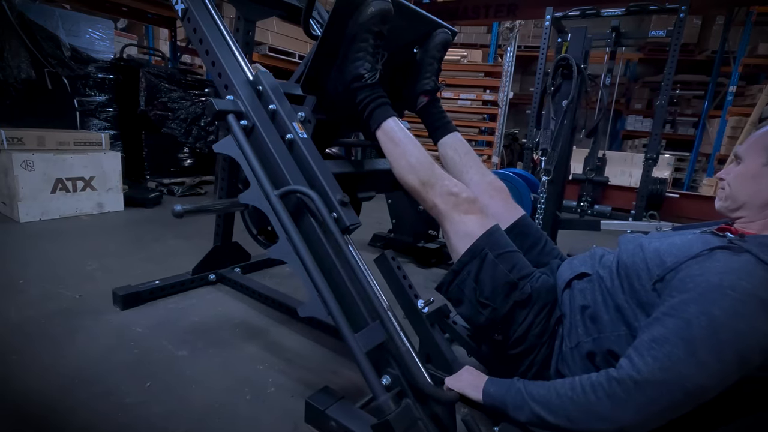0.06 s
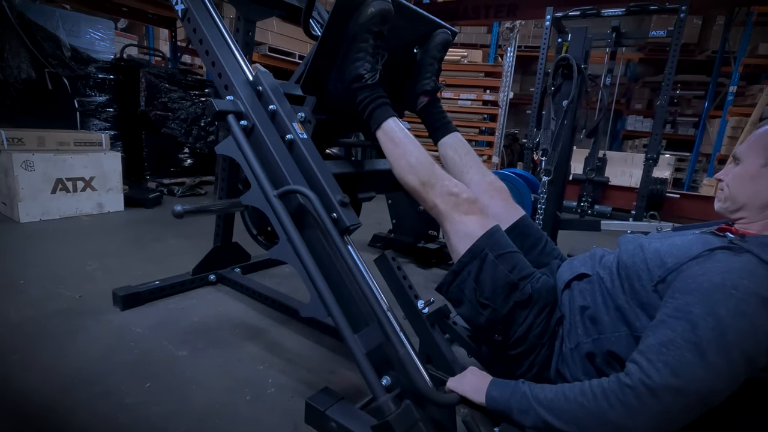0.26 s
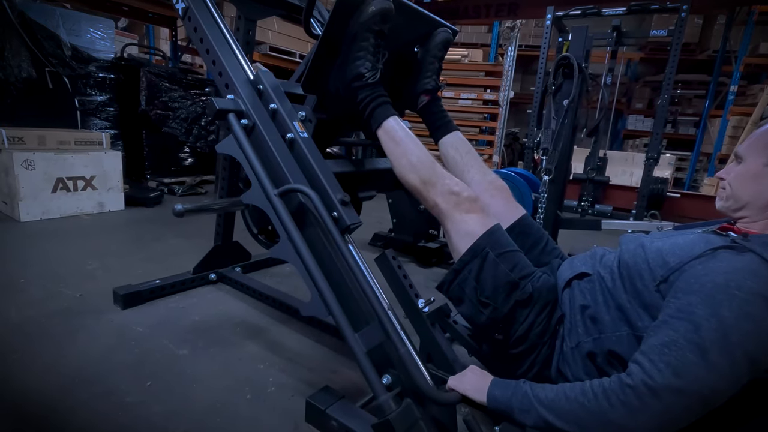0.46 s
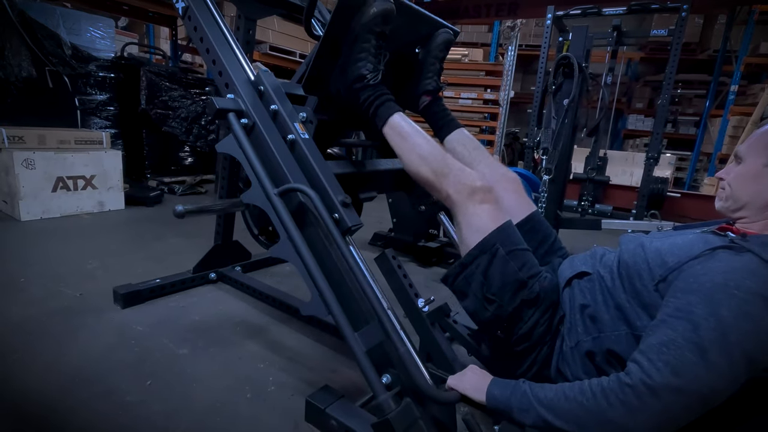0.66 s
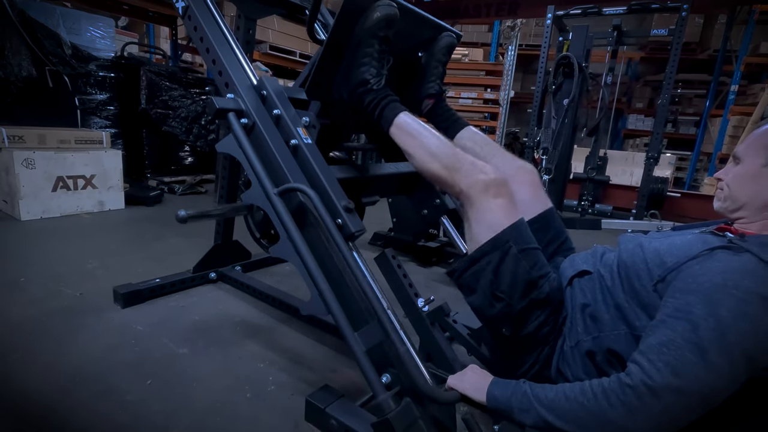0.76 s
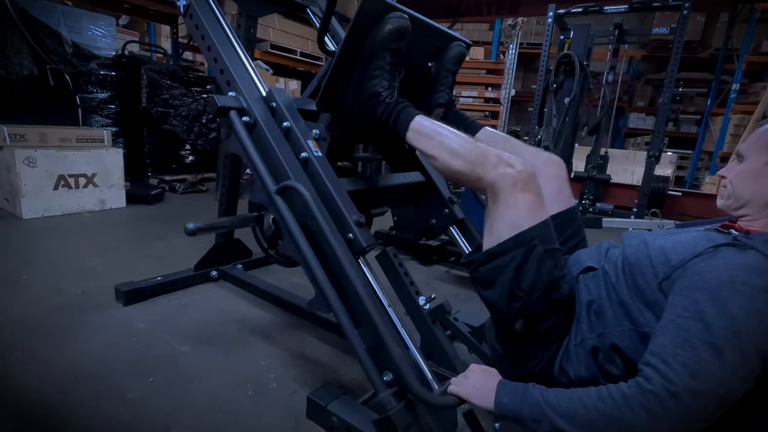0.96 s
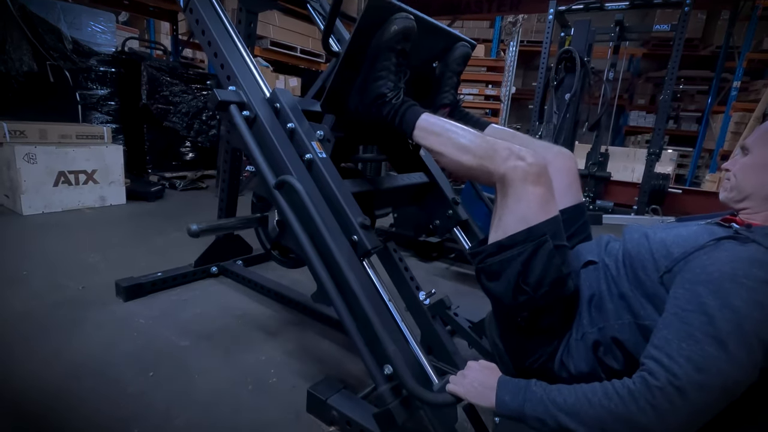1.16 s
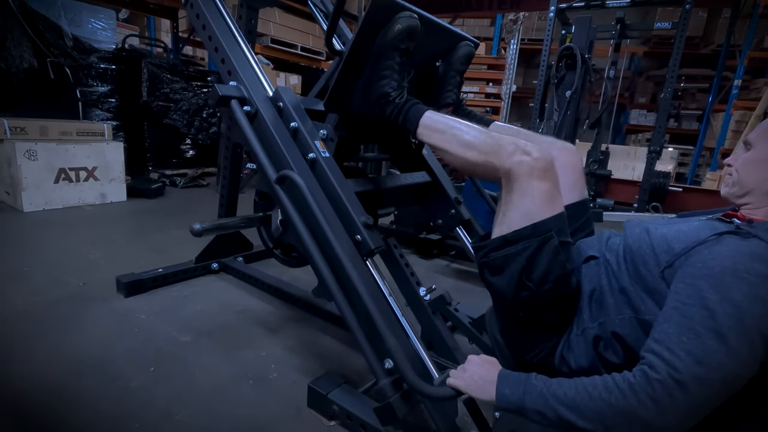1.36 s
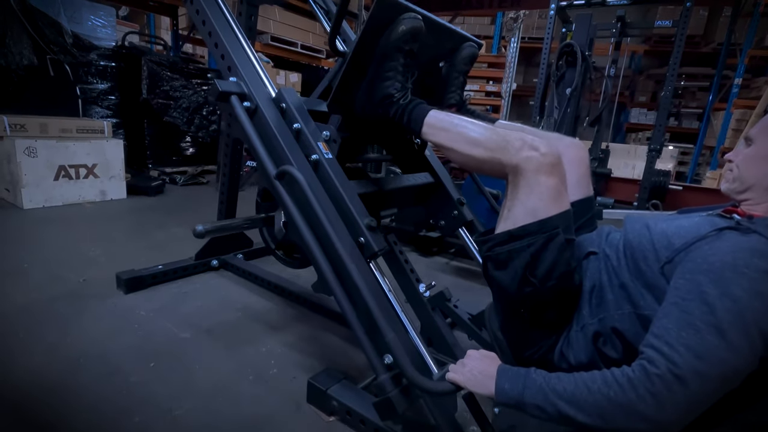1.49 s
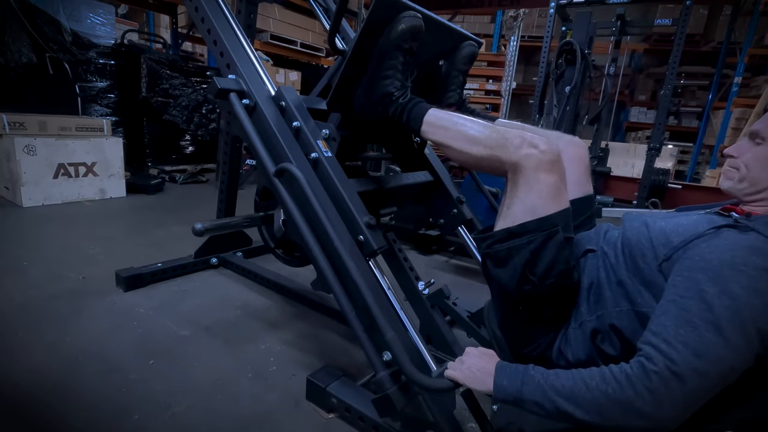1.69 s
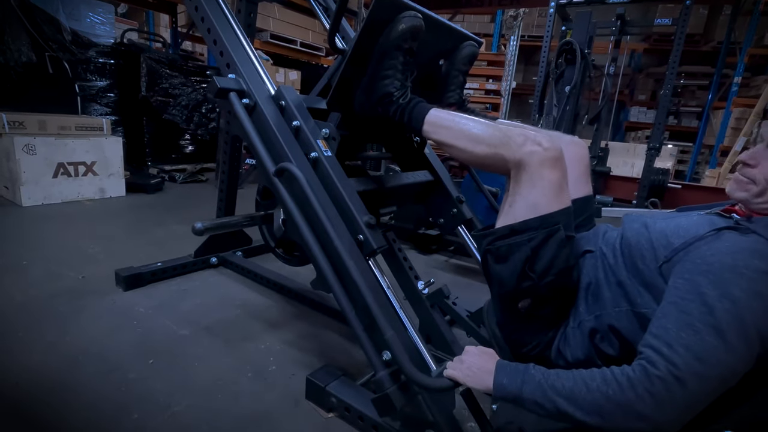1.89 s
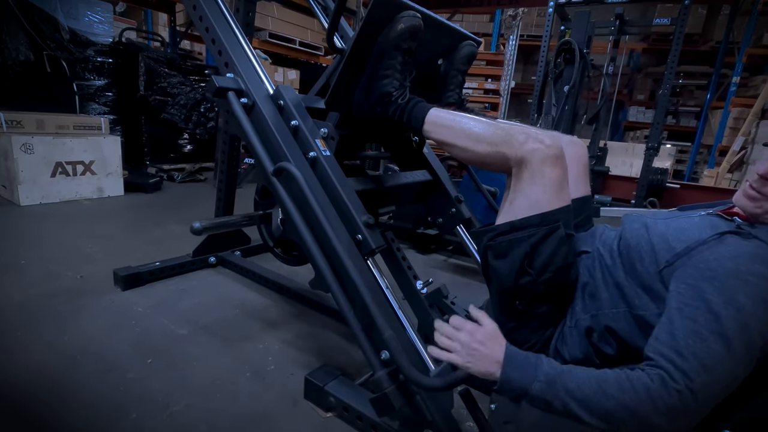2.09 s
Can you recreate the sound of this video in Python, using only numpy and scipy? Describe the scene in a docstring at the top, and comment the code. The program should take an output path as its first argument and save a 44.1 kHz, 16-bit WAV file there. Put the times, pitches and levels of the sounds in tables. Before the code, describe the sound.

A steel leg press in a large hall with faint low ventilation hum. At 0.25 s a locking handle clanks dully; from 0.75 to 1.1 s the frame creaks and the sled rolls with a faint hiss. A second, brighter handle clank comes at 1.13 s, a small tick at 1.4. The sled slams at 1.61 s, bounces at 1.79, rings briefly; light ticks near 2.1.

```python
"""Leg press in a large hall

Over a low ventilation hum, two locking handles clank, each a bank of ringing modes plus lumpy clatter noise.
Between them the frame creaks in dense random slips, and the sled rolls with a narrow-band tone and a hiss.
The sled lands hard on its stops and bounces: ringing steel, dead knocks and bright cracks; small parts tick.
Decaying noise echoes the blows; a nearly mono microphone suppresses noise and limits the loudest peaks."""
import sys
import numpy as np
from scipy import signal
from scipy.fft import rfft, irfft, next_fast_len
from scipy.io import wavfile
from scipy.ndimage import uniform_filter1d

SR = 44100
rng = np.random.default_rng(int(sys.argv[2]) if len(sys.argv) > 2 else 0)


def makeup_ratio(level_db):
    """Linear amplitude ratio for a level in decibels (20 dB per factor of ten)."""
    decades = np.asarray(level_db, float) / 20
    return 10 ** decades


def dump(signal):
    """Clip the signal to [-1, 1] and save it as 16-bit WAV at the path in sys.argv[1]."""
    limited = np.clip(np.atleast_2d(signal).T, -1, 1)
    pcm = np.round(limited * 32767).astype(np.int16)
    wavfile.write(sys.argv[1], SR, pcm)


N = 94374


def unit(x):
    """Scale to rms 1."""
    return x / np.sqrt(np.mean(x ** 2) + 1e-20)


def along(points, hz):
    """Read a curve of (Hz, value) points on a log frequency axis."""
    f, v = np.transpose(points)
    return np.interp(np.log(hz + 1), np.log(f + 1), v)


def curves(rows):
    """Draw one dB curve per column after the time; practically silent outside the rows."""
    s, *cols = np.transpose(rows)
    return [np.interp(np.arange(N) / SR, s, c, left=-140, right=-140) for c in cols]


def filtered(x, response):
    """Filter x by a gain that is a function of frequency."""
    size = next_fast_len(x.shape[-1] + 8192)
    spectrum = rfft(x, size) * response(np.fft.rfftfreq(size, 1 / SR))
    return irfft(spectrum, size)[..., :x.shape[-1]]


def colored(x, colour):
    """Shape x by a (Hz, dB) colour and bring it to rms 1."""
    return unit(filtered(x, lambda hz: makeup_ratio(along(colour, hz))))


def noise(colour, size):
    """Coloured noise of rms 1."""
    return colored(rng.standard_normal(size), colour)


def smooth(x, seconds):
    """A running mean, twice, along the last axis."""
    size = max(round(seconds * SR), 1)
    return uniform_filter1d(uniform_filter1d(x, size=size), size=size)


def add(track, s, x):
    """Mix x into the track at time s."""
    place = track[round(s * SR):][:len(x)]
    place += x[:len(place)]


# Reverb time of the hall. Each row: frequency in Hz, t60 in seconds.
HALL_DECAY = [(150, 0.5), (400, 0.53), (1000, 0.72), (2800, 0.71), (7000, 0.91), (10000, 0.23),
              (14000, 0.31)]
HALL_BUILD_S = 0.008


def hall(x):
    """The echoes build up quickly, then each frequency dies at its own speed."""
    hz, t, z = signal.stft(rng.standard_normal(SR), SR, nperseg=256)
    decay = makeup_ratio(-60 * t / along(HALL_DECAY, hz)[:, None])
    tail = signal.istft(z * decay, SR, nperseg=256)[1][:SR]
    tail = tail * (1 - np.exp(-np.arange(SR) / SR / HALL_BUILD_S))
    return signal.fftconvolve(x, tail / np.linalg.norm(tail))


WAVER_SHARE = .016  # how far the pitch of a mode wanders, as a share of it
RISE_CYCLES = 6.2  # a mode swells over this many cycles on top of the rise of the blow
RATTLE_DB, RATTLE_S = 3, 0.0031  # the clatter comes in lumps: depth, smoothing length


def strike(blows, modes, colour, ring_db, clatter_db, wet_db):
    """Each blow rings the modes of a steel part anew and shakes a burst of clatter out of its joints."""
    out, t = np.zeros(N), np.arange(SR) / SR
    hz, level, ring_s = np.transpose(modes)[:, :, None]
    for s, db, rise, t60, top_hz in blows:
        contact = lambda f: 1 / (1 + (f / top_hz) ** 4)  # a soft contact dulls the blow

        walk = np.cumsum(rng.standard_normal((len(modes), SR)), axis=1)
        drift = smooth(walk, RATTLE_S) * np.sqrt(2 * np.pi * WAVER_SHARE * hz / SR)
        scatter_db = rng.normal(0, 1.5, hz.shape)  # no two blows excite the modes alike
        swell = 1 - np.exp(-t / (rise + RISE_CYCLES / hz))
        size = makeup_ratio(level + scatter_db - 60 * t / ring_s) * contact(hz) * swell
        ring = makeup_ratio(db + ring_db) * np.sum(size * np.sin(2 * np.pi * hz * t + drift), axis=0)

        lumps = unit(makeup_ratio(RATTLE_DB * unit(smooth(rng.standard_normal(SR), RATTLE_S))))
        envelope = makeup_ratio(db + clatter_db - 60 * t / t60) * (1 - np.exp(-t / max(rise, 1e-4)))
        clatter = envelope * lumps * filtered(noise(colour, SR), contact)

        add(out, s, ring + clatter)
        add(out, s, makeup_ratio(wet_db) * hall(clatter + makeup_ratio(-5.5) * ring))
    return out


# Spectrum of the ventilation. Each row: frequency in Hz, relative level in dB.
HUM_COLOUR = [(12, -58), (20, -31), (54, 2.5), (90, -2.5), (122, -1.5), (207, -6), (324, -15), (519, -21.5),
              (565, -16), (1820, -31), (1980, -37.5), (11700, -46), (15500, -49)]
HUM_DB = -41.5


def hum():
    """Ventilation: steady noise with its weight in the bass."""
    return makeup_ratio(HUM_DB) * noise(HUM_COLOUR, N)


# Blows on the first handle. Each row: start in seconds, level in dB before the gains of ring and clatter,
# rise in seconds, clatter t60 in seconds, treble limit of the contact in Hz.
FIRST_BLOWS = [(.238, -41.5, 0.022, 0.3, 9000), (.2585, -15.5, 0.0026, 0.12, 2680),
               (.266, -12.5, 0.012, 0.12, 9000)]
# What it rings with. Each row: frequency in Hz, relative level in dB before scatter, t60 in seconds.
FIRST_RINGING = [(177.2, -12, 0.6), (237.4, -15.5, 0.69), (301, -13.5, 0.36), (450, -10.5, 0.65),
                 (575, -47, 0.15), (636.3, 6.5, 0.14), (723, -14.5, 0.64), (752, -15, 0.076),
                 (862, -10, 0.38), (1020, -18, 0.69), (1107, -5.5, 0.27), (1215, -22.5, .4),
                 (1720, -22.5, 0.79), (2263, -14.5, 0.27)]
# Colour of its clatter. Each row: frequency in Hz, relative level in dB.
FIRST_CLATTER = [(100, -49), (250, -27), (450, -2), (620, -7.5), (900, -9), (1500, -16), (1850, -21),
                 (2400, -29), (3200, -27), (4800, -41), (5800, -67.5), (8000, -38.5), (10000, -58.5),
                 (15500, -84)]


def first_handle():
    """The first locking handle: steel modes ring under clatter from its joints."""
    return strike(FIRST_BLOWS, FIRST_RINGING, FIRST_CLATTER, ring_db=-1.5, clatter_db=6, wet_db=-8)


# The frame taking the load. Each row: time in seconds, level in dB.
CREAK_LEVEL = [(.7, -64), (.745, -46), (.755, -42), (.788, -41.5), (.8, -37), (.83, -35.5), (.86, -37),
               (.9, -42), (.97, -47.5), (1.12, -52)]
# What the frame lets through. Each row: frequency in Hz, relative level in dB.
FRAME_COLOUR = [(120, -45), (200, -42), (328, -6.5), (640, -10.5), (671, -4.5), (983, -21), (1250, -14.5),
                (2010, -33.5), (3630, -36), (9000, -48.5), (11700, -87.5), (19800, -120)]
CREAK_SLIPS_PER_S = 12000  # on average


def creak():
    """Dense uneven slips sound through the frame as the load shifts."""
    slips = (rng.random(N) < CREAK_SLIPS_PER_S / SR) * rng.standard_normal(N)
    return makeup_ratio(curves(CREAK_LEVEL)[0]) * colored(slips, FRAME_COLOUR)


# The sled rolling. Each row: time in seconds, level of the bearing tone in dB, level of the hiss in dB.
ROLL_LEVELS = [(.86, -78, -103.5), (.92, -52, -64), (1.0, -54.5, -60.5), (1.08, -42, -59),
               (1.11, -46, -55.5), (1.16, -68, -95)]
# A hiss that rises under the last ticks. Each row: time in seconds, level in dB.
LATE_HISS_LEVEL = [(1.98, -75), (2.06, -60), (2.14, -56)]
# Spectrum of both hisses. Each row: frequency in Hz, relative level in dB.
HISS_COLOUR = [(1500, -30.5), (2500, 0.5), (6000, 1.5), (12000, -1), (14000, 4), (15500, -23)]
BEARING_HZ, BEARING_WIDTH_HZ = 817, 33  # centre, distance to half amplitude


def rolling():
    """Narrow-band noise wavers like a bearing tone beside a hiss; the hiss returns at the end."""
    tone_db, hiss_db = curves(ROLL_LEVELS)
    bearing = lambda hz: 1 / (1 + ((hz - BEARING_HZ) / BEARING_WIDTH_HZ) ** 2)
    tone = unit(filtered(rng.standard_normal(N), bearing))
    hiss_size = makeup_ratio(hiss_db) + makeup_ratio(curves(LATE_HISS_LEVEL)[0])
    return makeup_ratio(tone_db) * tone + hiss_size * noise(HISS_COLOUR, N)


# Blows on the second handle. Each row: start in seconds, level in dB before the gains of ring and clatter,
# rise in seconds, clatter t60 in seconds, treble limit of the contact in Hz.
SECOND_BLOWS = [(1.127, -16.5, 0.0028, 0.086, 13900), (1.138, -19.5, 0.0075, 0.2, 5930),
                (1.315, -44, 0.0068, 0.062, 1510)]
# What it rings with. Each row: frequency in Hz, relative level in dB before scatter, t60 in seconds.
SECOND_RINGING = [(161.5, -7.5, 0.5), (345, -6, 0.24), (407, -8.5, 0.66), (567, -20.5, 0.15),
                  (712, -3, 0.33), (820, -12, 0.44), (1042, -2.5, 0.38), (1200, -12.5, 0.41),
                  (1286, -5.5, 0.29), (1620, -18, 0.74), (2262, -4.5, 0.19), (2400, -36, .25),
                  (3320, -22, 0.27), (4100, -27, 0.29)]
# Colour of its clatter. Each row: frequency in Hz, relative level in dB.
SECOND_CLATTER = [(100, -55), (250, -21), (340, -11.5), (500, -16.5), (690, -9.5), (1000, -13.5),
                  (2100, -20.5), (3500, -23.5), (6200, -36.5), (7000, -64), (9000, -52), (15500, -63)]


def second_handle():
    """The second locking handle: its own steel modes and clatter."""
    return strike(SECOND_BLOWS, SECOND_RINGING, SECOND_CLATTER, ring_db=1, clatter_db=5.0, wet_db=-8.0)


# Small loose parts. Each row: start in seconds, level in dB before the swell, pitch in Hz,
# cycles to die by 60 dB.
LOOSE_TICKS = [(1.4113, -10, 1600, 8), (1.4122, -19, 1050, 12), (1.4113, -17, 3600, 8),
               (2.0952, -16, 4500, 6), (2.1212, -17, 7800, 7), (2.1327, -12, 3800, 6),
               (2.1328, -17, 12000, 11)]


def ticks():
    """A tick is a few cycles of a sine that swell over about one cycle and die."""
    out, t = np.zeros(N), np.arange(SR // 20) / SR
    for s, db, hz, cycles in LOOSE_TICKS:
        envelope = makeup_ratio(db - 60 * t * hz / cycles) * (1 - np.exp(-t * hz))
        tick = envelope * np.sin(2 * np.pi * hz * t)
        add(out, s, tick)
        add(out, s, makeup_ratio(-10.5) * hall(tick))
    return out


# Blows on the sled. Each row: start in seconds, level in dB before the gains of ring and clatter,
# rise in seconds, clatter t60 in seconds, treble limit of the contact in Hz.
SLED_BLOWS = [(1.585, -41, 0.055, 0.09, 5930), (1.6115, -6, 0.00075, 0.032, 15000),
              (1.645, -6, 0.01, 0.043, 3400), (1.688, -13.5, 0.018, 0.21, 3430),
              (1.791, -9, 0.0016, 0.052, 14600), (1.808, -18.5, 0.004, 0.21, 3530),
              (1.872, -14.5, 0.0048, 0.13, 3240)]
# What it rings with. Each row: frequency in Hz, relative level in dB before scatter, t60 in seconds.
SLED_RINGING = [(129.4, -14.5, 0.29), (165.9, -19, 0.57), (235.8, -10, 0.62), (320, -13.5, 1),
                (446.6, -10, 0.56), (625, -15.5, 0.63), (669, -18, 0.51), (797, -16, 0.47), (1027, -25, 1),
                (1221, -24.5, 1), (1402, -18.5, 0.59), (1660, -10, 0.19), (1709, -21, 0.58),
                (2173, -19.5, 0.56)]
# Colour of its clatter. Each row: frequency in Hz, relative level in dB.
SLED_CLATTER = [(30, -58), (120, -39), (270, -30.5), (420, -0.5), (550, -17), (770, -20.5), (1000, -16),
                (2100, -21.5), (4000, -31), (7000, -59.5), (10000, -62), (15500, -58)]


def sled():
    """The sled lands and bounces: long low modes ring under clatter, strong in the hall."""
    return strike(SLED_BLOWS, SLED_RINGING, SLED_CLATTER, ring_db=-1.0, clatter_db=3, wet_db=-1.0)


# The sled meets its stops. Each row: start in seconds, knock level in dB, knock t60 in seconds,
# crack level in dB.
STOP_KNOCKS = [(1.6125, 3.5, 0.055, -9.5), (1.7915, 7, 0.034, -18)]
# What the stops ring with. Each row: frequency in Hz, relative level in dB, share of the knock t60.
STOP_MODES = [(765.6, 0, 0.88), (1407, -7.5, 0.59), (2250, -22, 0.92)]
# Spectrum of the crack. Each row: frequency in Hz, relative level in dB.
CRACK_COLOUR = [(800, -17), (1500, 15), (3000, 0), (5000, -1), (7500, -9.5), (11000, -21.5), (15500, -21)]
CRACK_T60_S = 0.059


def knocks():
    """The stop blocks: a few modes that die at once, under a bright crack of noise."""
    out, t = np.zeros(N), np.arange(SR // 8) / SR
    for s, db, t60, crack_db in STOP_KNOCKS:
        note = sum(makeup_ratio(level - 60 * t / (t60 * share)) * np.sin(2 * np.pi * hz * t)
                   for hz, level, share in STOP_MODES)
        crack = makeup_ratio(crack_db - 60 * t / CRACK_T60_S) * noise(CRACK_COLOUR, len(t))
        knock = makeup_ratio(db) * (1 - np.exp(-t / .0004)) * note + crack
        add(out, s, knock)
        add(out, s, makeup_ratio(-6.5) * hall(knock))
    return out


# How narrow the stereo image is. Each row: frequency in Hz, side relative to mid in dB.
SIDE_LEVEL = [(30, -22), (100, -34), (300, -36), (700, -40), (1500, -33), (4000, -26), (12000, -19)]
SIDE_HISS_DB = -66


def two_ports(mid):
    """Two nearly alike microphone ports: a faint scattered copy and a hiss make the difference."""
    scatter = rng.standard_normal(512) * makeup_ratio(-np.arange(512) / 20)
    scattered = np.convolve(mid, scatter / np.linalg.norm(scatter))[:N]
    side = filtered(scattered, lambda hz: makeup_ratio(along(SIDE_LEVEL, hz)))
    side = side + makeup_ratio(SIDE_HISS_DB) * rng.standard_normal(N)
    return np.array([mid + side, mid - side])


def scene():
    """All sources and their hall echoes, heard at both microphone ports."""
    handles = first_handle() + second_handle()
    landing = sled() + knocks()
    return two_ports(hum() + handles + creak() + rolling() + ticks() + landing)


SUPPRESS_DB, SUPPRESS_OVER_DB, SUPPRESS_SOFT_DB = 8.5, 11.5, 1.5  # depth, threshold over the floor, softness


def suppress(x):
    """Noise suppressor: what sinks near the steady noise of its band is turned down, so tails end early."""
    z = signal.stft(x, nperseg=1024, noverlap=768)[2]
    power = np.abs(z.mean(0)) ** 2
    power = uniform_filter1d(uniform_filter1d(power, size=9, axis=0), size=5, axis=1)
    level_db = 10 * np.log10(np.abs(power) + 1e-18)
    floor_db = np.percentile(level_db, 10, axis=1, keepdims=True)
    over_db = level_db - floor_db - SUPPRESS_OVER_DB
    cut = 1 / (1 + np.exp(np.clip(over_db / SUPPRESS_SOFT_DB, -30, 30)))
    return signal.istft(z * makeup_ratio(-SUPPRESS_DB * cut), nperseg=1024, noverlap=768)[1][:, :N]


TOP = 1.03  # amplitude at which the microphone limits
LOW_CUT_HZ, TOP_HZ = 51, 15800


def roll_off(x):
    """The treble ends steeply here."""
    return signal.sosfilt(signal.butter(12, 15800, fs=SR, output="sos"), x)


def record(dry):
    """The microphone: noise suppression, limiting of the loudest blows, then band limits."""
    quiet = suppress(dry)
    limited = quiet / (1 + np.abs(quiet / TOP) ** 16) ** (1 / 16)
    mix = filtered(limited, lambda hz: (hz < TOP_HZ) * hz ** 2 / (hz ** 2 + LOW_CUT_HZ ** 2))
    return roll_off(mix)


dry = scene()
out = record(dry)
dump(out)
```